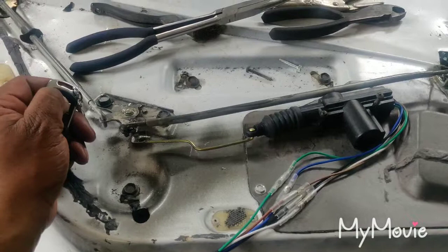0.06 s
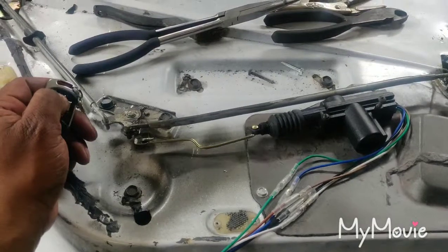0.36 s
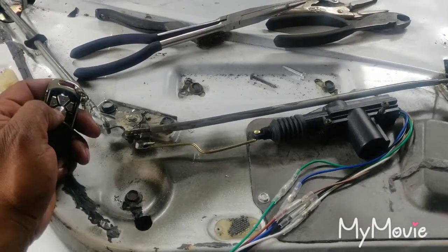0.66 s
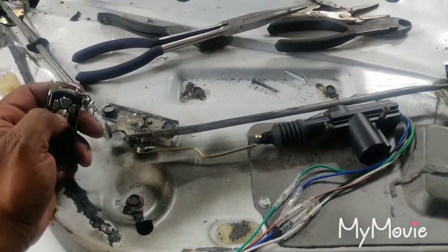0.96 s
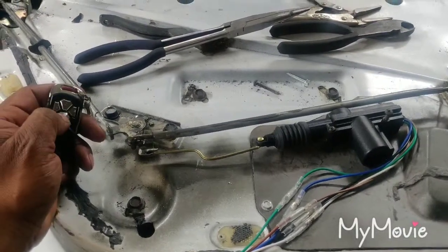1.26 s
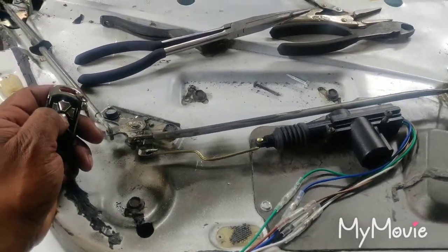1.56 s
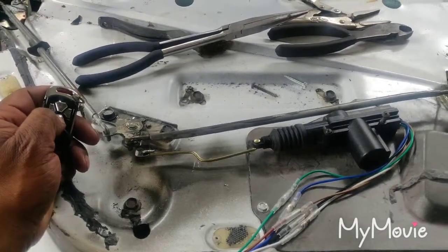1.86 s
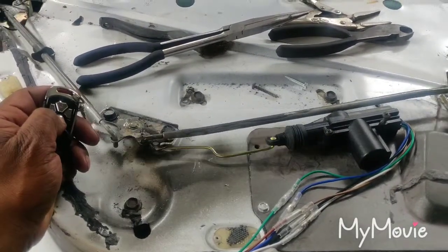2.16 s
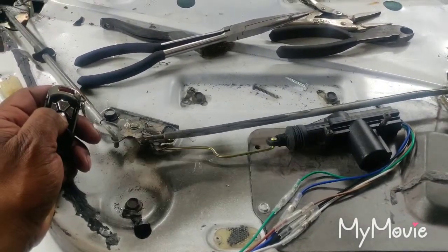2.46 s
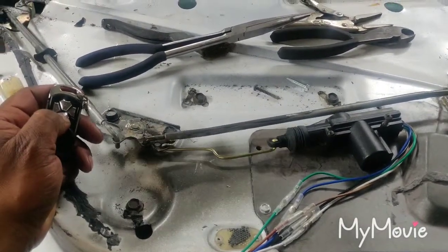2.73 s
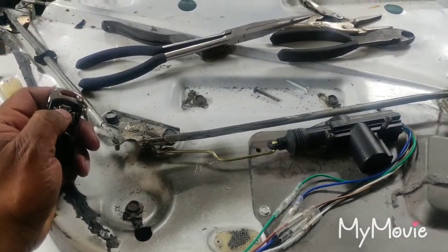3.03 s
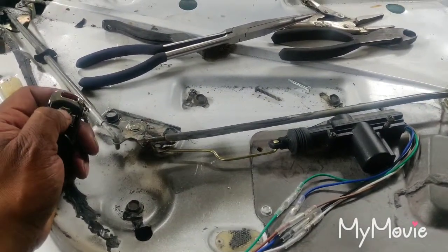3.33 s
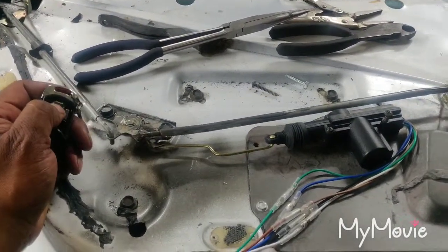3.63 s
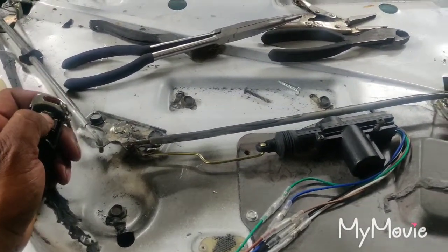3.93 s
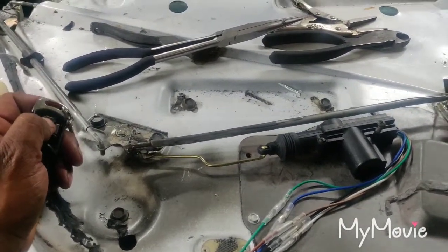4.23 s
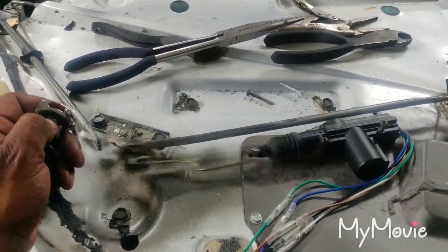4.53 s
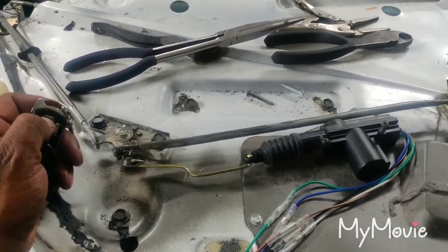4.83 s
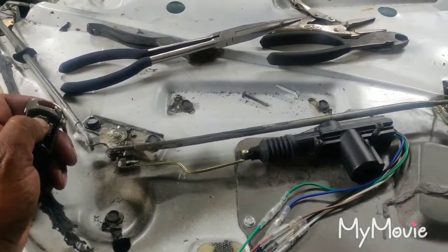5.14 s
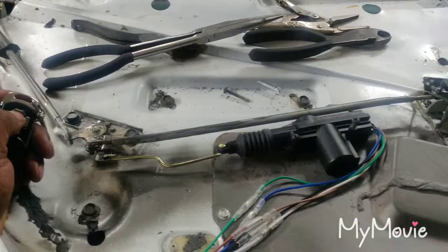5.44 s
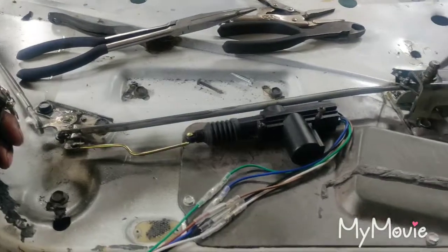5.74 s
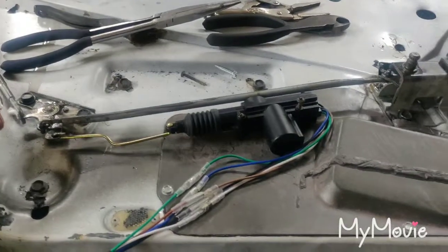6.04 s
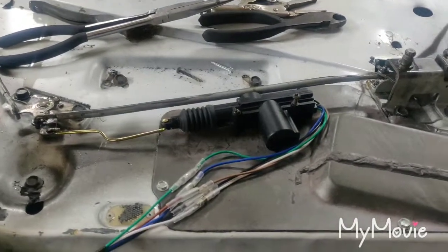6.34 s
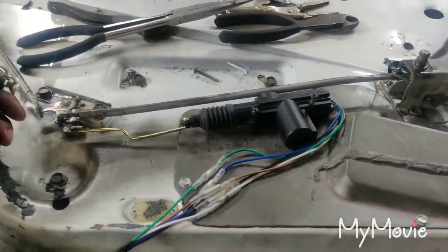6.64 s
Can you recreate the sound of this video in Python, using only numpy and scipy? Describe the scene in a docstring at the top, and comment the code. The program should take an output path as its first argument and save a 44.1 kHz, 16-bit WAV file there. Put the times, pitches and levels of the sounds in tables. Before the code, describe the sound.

In a quiet garage, a key fob button clicks faintly and an electric actuator throws a latch rod on a bare car door with a sharp, rattling clack and a short steel ring. About two seconds later it unlocks more softly, then locks sharply again. Each stroke is followed by the button's release and a small tick of gears settling. Faint handling knocks come at the end. The microphone is close.

```python
"""Car door lock in a garage

A bare car door lies in a quiet garage; door and key fob are close to a phone's microphone.
Lock, unlock, lock: the button clicks, the motor takes up its slack, spins its gears for a twentieth of
a second and throws the rod against its stop, where it rebounds; the steel door rings. After 0.4 s the
current ends and the gears run back. Near the end come faint handling knocks."""
import sys
import numpy as np
from scipy import signal
from scipy.fft import rfft, irfft
from scipy.io import wavfile

SR = 44100
rng = np.random.default_rng(int(sys.argv[2]) if len(sys.argv) > 2 else 0)


def log_audio(samples):
    """Write samples as a 16-bit WAV file to the path given in sys.argv[1]."""
    # one column per channel
    frames = np.atleast_2d(samples).T
    # limit to full scale, then quantise
    limited = np.clip(frames, -1, 1)
    pcm = np.round(limited * 32767).astype(np.int16)
    wavfile.write(sys.argv[1], SR, pcm)


N = 295029
RING_S = np.arange(SR) / SR  # one second of ringing
LOCK, UNLOCK = 0, 1  # the two ways of a stroke


def undb(db):
    """Decibels to gain."""
    return 10 ** (np.asarray(db) / 20)


def fade(t60):
    """Free decay that loses 60 dB in t60 seconds."""
    return np.exp(-np.log(1000) * RING_S / t60)


def unit(x):
    """Scale a short sound to the energy of 10 ms at full level."""
    return x * np.sqrt(SR / 100 / np.sum(x ** 2))


def along(points, hz):
    """Read (f/Hz, value) points on a log-frequency axis."""
    f, value = np.transpose(points)
    return np.interp(np.log(hz + 1e-9), np.log(f), value)


def noise(colour, size):
    """Noise of rms 1 with a spectrum of (f/Hz, level/dB) points."""
    gain = undb(along(colour, np.fft.rfftfreq(size, 1 / SR)))
    x = irfft(rfft(rng.standard_normal(size)) * gain, size)
    return x / np.std(x)


def modes(table):
    """Ring of a struck body; level is each mode's energy, neighbours swing in opposite directions."""
    return unit(sum((-1) ** k * undb(db) / np.sqrt(t60) * fade(t60) * np.sin(2 * np.pi * hz * RING_S)
                    for k, (hz, db, t60) in enumerate(table)))


def both_ways(table, t60):
    """The ring of a body when locking and when unlocking."""
    return [modes([(hz, levels[way], t60) for hz, *levels in table]) for way in (LOCK, UNLOCK)]


def dull(x, bright_hz):
    """A softer contact lasts longer and loses its treble."""
    keep = np.exp(-2 * np.pi * bright_hz / SR)
    return signal.lfilter([(1 - keep) ** 2], [1, -2 * keep, keep ** 2], x)


def add(track, s, db, sound):
    """Lay a sound into a track at time s."""
    i = int(s * SR)
    track[i:i + len(sound)] += undb(db) * sound[:N - i]


# room tone: f/Hz, level/dB
ROOM_TONE = [(12, -29), (20, 1), (81, -9), (120, -3), (154, -7.5), (255, -8), (377, -11), (410, -19.5),
             (513, -12), (624, -20), (1480, -27.5), (2260, -31), (4000, -35), (9000, -38), (16000, -37)]
def room_tone(rms_db=-64):
    """Low steady noise of the quiet garage, all around the microphone."""
    return undb(rms_db) * noise(ROOM_TONE, N)


# reverberation of the garage: f/Hz, t60/s
GARAGE_DECAY = [(100, 1), (300, 0.37), (1000, 0.36), (3000, 0.31), (7000, 0.31), (11000, .25), (16000, .19)]
def garage(onset_s=.005):
    """Diffuse echo off bench and bare walls, in half-octave bands; the treble dies first."""
    spectrum, hz = rfft(rng.standard_normal(SR)), np.fft.rfftfreq(SR, 1 / SR)
    edges = 62.5 * 2 ** (np.arange(18) / 2)
    tail = np.zeros(SR)
    for lo, hi in zip(edges, edges[1:]):
        band = irfft(spectrum * ((hz >= lo) & (hz < hi)), SR)
        tail += band * fade(along(GARAGE_DECAY, np.sqrt(lo * hi)))
    tail *= np.minimum(RING_S / onset_s, 1)
    return tail / np.sqrt(np.sum(tail ** 2))


# faint bumps and ticks of handling: t/s, level/dB
HANDLING_BUMPS = [(6.219, -51), (6.276, -50.5), (6.301, -51.5)]
HANDLING_TICKS = [(6.334, -52.5), (6.412, -55)]
def handling(thud_t60=.096, tick_t60=.15, soft_hz=500):
    """Something is moved: dull bumps, then light ticks that end in a short scrape."""
    out = np.zeros(N)
    thud_colour = [(40, -25.5), (130, 6.5), (400, -1.5), (600, -18), (3000, -48)]
    tick_colour = [(500, -23), (1000, -4.5), (1350, -9.5), (1750, -3.5),
                   (2700, -14.5), (6500, -20.5), (12000, -41)]
    for s, db in HANDLING_BUMPS:
        thud = noise(thud_colour, SR) * fade(thud_t60)
        add(out, s, db, unit(dull(thud, soft_hz)))
    for s, db in HANDLING_TICKS:
        add(out, s, db, unit(noise(tick_colour, SR) * fade(tick_t60)))
    return out


# button pressed and let go: t/s, level/dB, brightness/Hz
BUTTON_CLICKS = [(0.0299, -46, 15100), (0.3332, -49, 15000), (2.2119, -46, 5480), (2.545, -44.5, 6410),
                 (4.6318, -44, 17700), (4.9337, -46, 15000)]
# modes of the fob's shell: f/Hz, level/dB, t60/s
SHELL_MODES = [(1080, -2.5, .009), (1900, -3, .007), (3200, -8, .005), (5000, -5.5, 0.0041),
               (6600, -1, .006), (10800, -9, 0.0024), (14800, 1, .004)]
def fob(snap_db=-7, snap_t60=.006):
    """Close to the microphone, the button's dome snaps over inside a small plastic shell."""
    out, shell = np.zeros(N), modes(SHELL_MODES)
    for s, db, bright_hz in BUTTON_CLICKS:
        snap = undb(snap_db) * unit(rng.standard_normal(SR) * fade(snap_t60))
        add(out, s, db, dull(shell + snap, bright_hz))
    return out


# steel skin, stirred differently by push and pull: f/Hz, locking level/dB, unlocking level/dB
SKIN_MODES = [(82, -21, -19), (135, -9.5, -9.5), (151, -8, -10), (164, -4.5, -10), (206, -2, -12),
              (226, 1, -2), (264.7, 2.5, -3), (314.5, -11.5, -1.5), (352, -3, -5), (383, -0.5, -8),
              (396.7, -4, -8), (452, -5.5, -10), (501, -10.5, -10), (526.2, -5.5, -6), (619, -11.5, -8.5),
              (711, -14, -7), (740, -14.5, -12.5), (793.7, -12, -9.5), (892.3, -10, -9), (973, -12.5, -26),
              (1126.4, -11, -17), (1160, -13.5, -28), (1364, -25, -34), (1537, -11.5, -48),
              (1564, -15, -39), (1706, -20, -21.5), (1814, -16.5, -24), (2080, -16.5, -32),
              (2240, -20, -23)]
# low, slowly dying boom of the garage, stirred by each thud: f/Hz, level/dB, t60/s
GARAGE_BOOM = [(128, -2, .36), (156, 2, .26)]
def door(blows, spread_s=.001, skin_t60=.145, rumble_db=-2.5, rumble_t60=.17, boom_db=-14):
    """Bending waves spread over the steel: strong modes, a rumble of weak ones; the garage booms."""
    out, skin = np.zeros(N), both_ways(SKIN_MODES, skin_t60)
    boom = undb(boom_db) * modes(GARAGE_BOOM)
    spread = 1 - np.exp(-RING_S / spread_s)
    colour = [(50, -34.5), (110, -8), (230, -.5), (450, -3.5), (700, -11.5), (1500, -15), (4000, -49)]
    for s, _, thud_db, _ in blows:
        rumble = undb(rumble_db) * unit(noise(colour, SR) * fade(rumble_t60))
        add(out, s, thud_db, (skin[way_at(s)] + boom + rumble) * spread)
    return out


# crowded short modes of housing, rod and latch: f/Hz, level/dB
CLACK_COLOUR = [(150, -11), (400, -4.5), (900, 2), (1350, -1.5), (1900, 2), (2600, -3.5), (3100, -1.5),
                (4200, -4), (5300, -8), (6500, 1), (8200, -13), (11000, -15), (13000, -11), (14800, -4.5)]
# thin link rod: f/Hz, locking level/dB, unlocking level/dB
ROD_MODES = [(2890, -8.5, -16), (3550, -8, 11), (3770, -13, -21), (4490, -6.5, -19)]
# small steel parts of the latch: f/Hz, level/dB, t60/s
LATCH_MODES = [(6234, -2, 0.077), (6330, -2, 0.026), (6670, -3, 0.054), (6870, -2, 0.018), (6790, -5, .06),
               (7180, -6, 0.017)]
def mechanism(blows, clack_t60=.024, rattle_t60=.081, rod_t60=.22,
              rattle_db=-16, rod_db=-21, latch_db=-21):
    """Each blow lands on another spot and stirs its own modes; loose parts rattle, the latch rings."""
    out, rod, latch = np.zeros(N), both_ways(ROD_MODES, rod_t60), modes(LATCH_MODES)
    decay = fade(clack_t60) + undb(rattle_db) * fade(rattle_t60)
    for s, clack_db, _, bright_hz in blows:
        clack = unit(noise(CLACK_COLOUR, SR) * decay)
        add(out, s, clack_db, dull(clack + undb(rod_db) * rod[way_at(s)], bright_hz))
        add(out, s, clack_db + latch_db, latch)
    return out


def blow(s, kind, clack_db=0, thud_db=0):
    """One blow of a kind, made stronger or weaker: t/s, clack/dB, door thud/dB, brightness/Hz."""
    return s, kind[0] + clack_db, kind[1] + thud_db, kind[2]


def gears(start, end, tooth, gain_db=0, first_hz=230, last_hz=420, scatter_db=3, slop=.22):
    """Teeth knock unevenly and ever faster while the gears run up."""
    teeth, s = [], start
    for clack, lag, thud in rng.standard_normal((40, 3)):
        if s < end:
            teeth.append(blow(s, tooth, gain_db + scatter_db * clack, gain_db + scatter_db * thud))
        s += np.exp(slop * lag) / np.interp(s, [start, end], [first_hz, last_hz])
    return teeth


# blows under power, a row for each way: clack/dB, thud/dB, brightness/Hz
MOTOR_JERK = [(-38, -32, 8000), (-38, -35, 5500)]
SLACK_CLOSING = [(-36, -19, 7000), (-27.5, -24.5, 10000)]
LOADED_TOOTH = [(-35, -28, 7500), (-34, -29, 6800)]
def drive(start, stop, way, slack_s=(.003, .006), spin_up_s=.009):
    """The motor twitches, takes up the slack and winds the rod along."""
    knocks = [blow(start, MOTOR_JERK[way]), blow(start + slack_s[way], SLACK_CLOSING[way])]
    return knocks + gears(start + spin_up_s, stop, LOADED_TOOTH[way])


# unpowered blows, a row for each way: clack/dB, thud/dB, brightness/Hz
GEAR_DROP = [(-40.5, -35, 9000), (-45, -37.5, 4300)]
PLUNGER_REST = [(-46, -32, 15000), (-53, -37.5, 4200)]
def run_back(off, way, drop_s=.004, settle_s=.019, end_s=.032, jerk_db=-1, idle_db=-11):
    """The current ends: the motor twitches, the gears drop and roll back, the plunger settles."""
    knocks = [blow(off, GEAR_DROP[way], jerk_db, jerk_db),
              blow(off + drop_s, GEAR_DROP[way]),
              blow(off + settle_s, PLUNGER_REST[way])]
    return knocks + gears(off + drop_s, off + end_s, GEAR_DROP[way], idle_db)


# the rod at the end of its travel, a row for each way: clack/dB, thud/dB, brightness/Hz
END_STOP = [(-15.8, -12, 12200), (-30, -24, 10000)]
def snap_over(stop, way, gap_s=.003, clack_step_db=-2.3, thud_db=-13, count=2):
    """Just before the stop the latch lever flips over in light knocks that grow harder."""
    return [blow(stop - k * gap_s, END_STOP[way], k * clack_step_db, thud_db)
            for k in range(1, count + 1)]


def slam(stop, way, gap_s=.008, slowing=1.05, loss_db=(3.5, 6), clack_db=-3.5, thud_db=-4, rebounds=4):
    """The rod hits its stop and rebounds, each time later and weaker."""
    blows, s = [blow(stop, END_STOP[way])], stop
    for k in range(rebounds):
        s += gap_s * slowing ** k
        lost_db = (k + 1) * loss_db[way]
        blows.append(blow(s, END_STOP[way], clack_db - lost_db, thud_db - lost_db))
    return blows


# strokes of the actuator: motor on t/s, way, rod at its stop t/s, current off t/s
LOCK_STROKES = [(0.1135, LOCK, 0.163, 0.5125), (2.2945, UNLOCK, 2.3368, 2.6925),
                (4.7165, LOCK, 4.7645, 5.1135)]
def actuator():
    """All the blows of gears, rod and latch, stroke by stroke."""
    blows = []
    for start, way, stop, off in LOCK_STROKES:
        blows += drive(start, stop, way) + snap_over(stop, way) + slam(stop, way) + run_back(off, way)
    return blows


def way_at(s):
    """The way of the latest stroke: LOCK or UNLOCK."""
    return [way for start, way, _, _ in LOCK_STROKES if start <= s][-1]


def scene(parts_db=-1, door_db=-2, parts_wet_db=-6, door_wet_db=-11, hand_wet_db=-10):
    """Door and fob near one microphone, the garage around them."""
    room, air = garage(), room_tone()
    hand = fob() + handling()
    blows = actuator()
    parts = undb(parts_db) * mechanism(blows)
    skin = undb(door_db) * door(blows)
    to_walls = undb(parts_wet_db) * parts + undb(door_wet_db) * skin + undb(hand_wet_db) * hand
    echo = signal.fftconvolve(to_walls, room)[:N]
    return (air + echo + hand + skin + parts)[None]


def record(dry, top_hz=15900):
    """The phone cuts the highest treble steeply."""
    return signal.sosfilt(signal.ellip(10, .2, 70, top_hz, fs=SR, output="sos"), dry)


dry = scene()
out = record(dry)
log_audio(out)
```